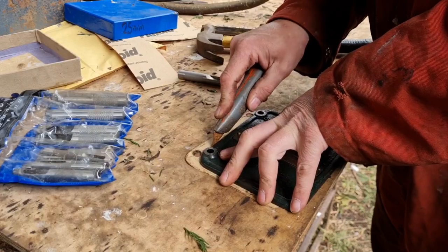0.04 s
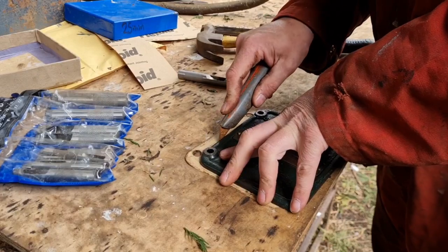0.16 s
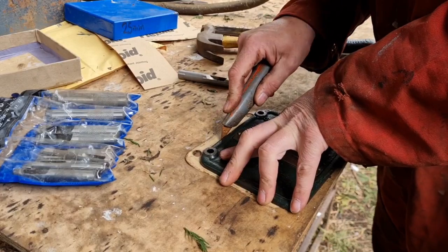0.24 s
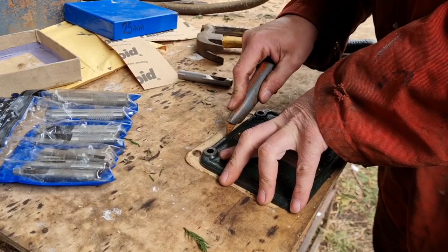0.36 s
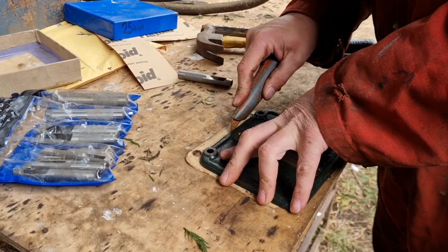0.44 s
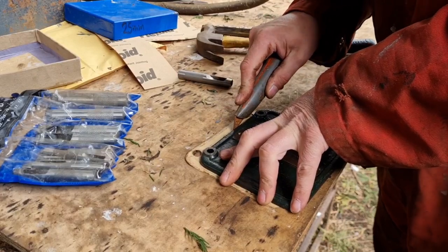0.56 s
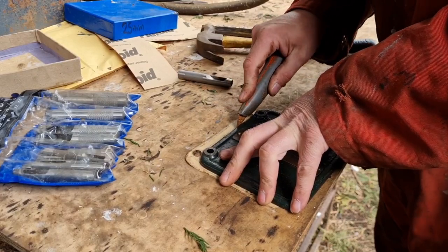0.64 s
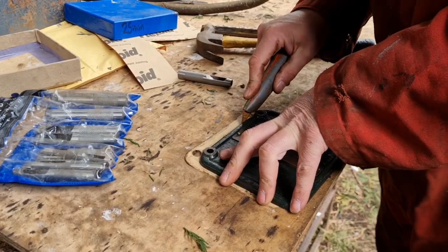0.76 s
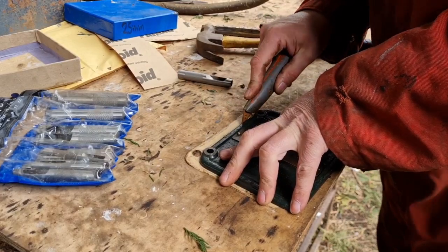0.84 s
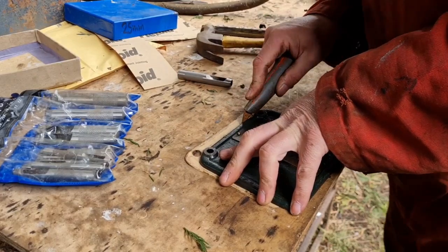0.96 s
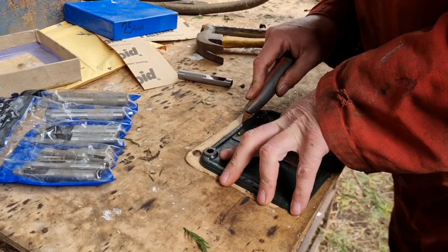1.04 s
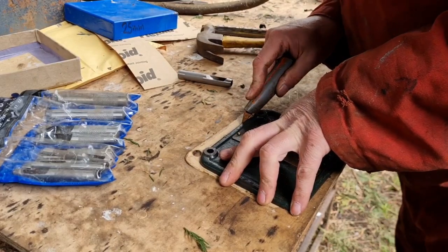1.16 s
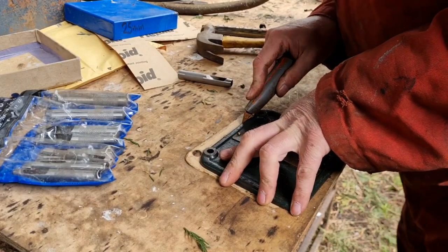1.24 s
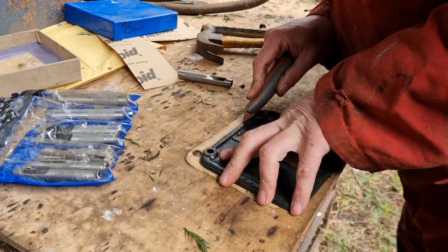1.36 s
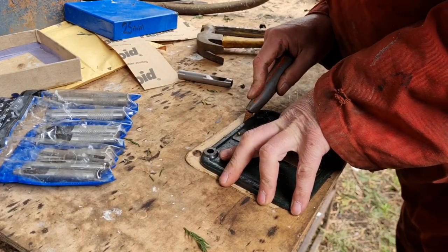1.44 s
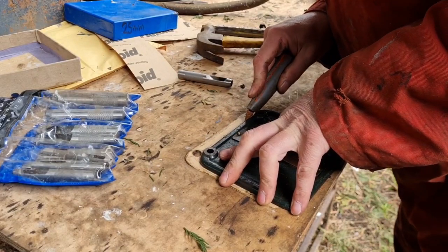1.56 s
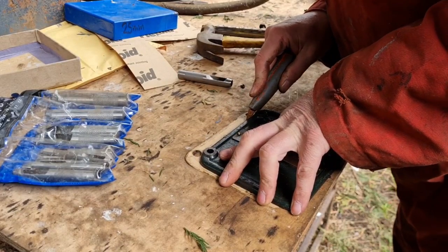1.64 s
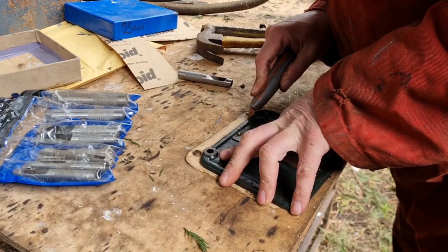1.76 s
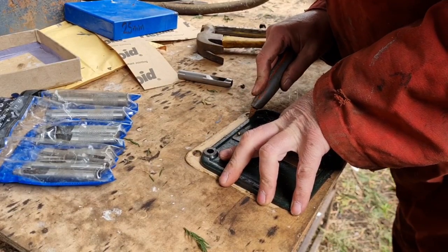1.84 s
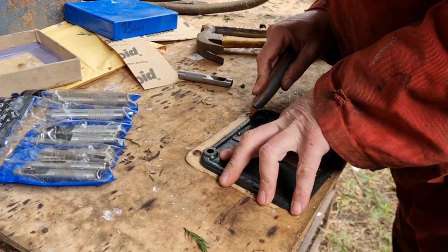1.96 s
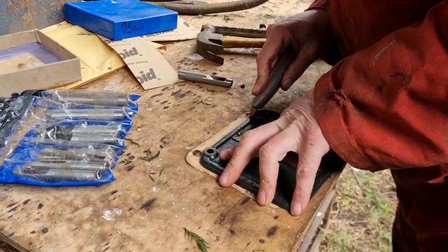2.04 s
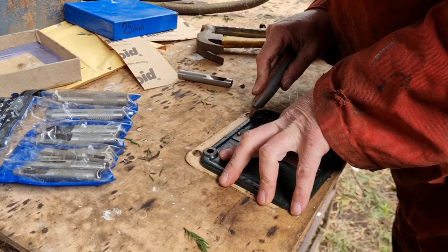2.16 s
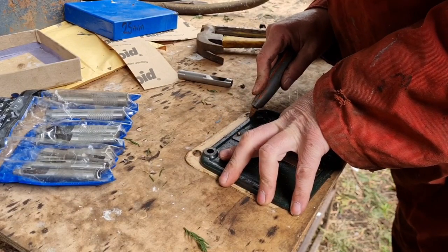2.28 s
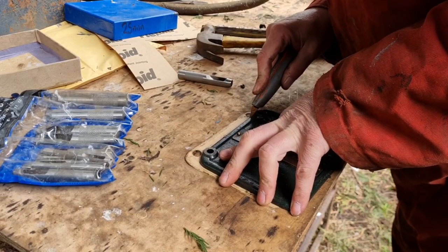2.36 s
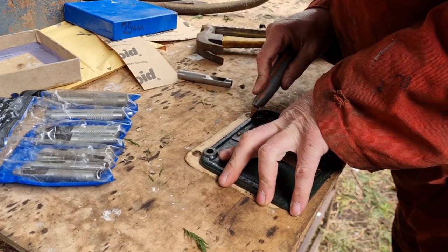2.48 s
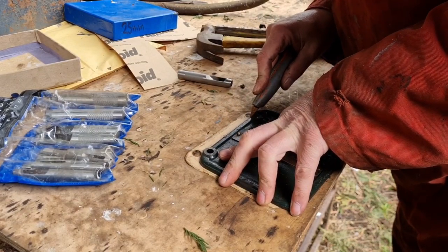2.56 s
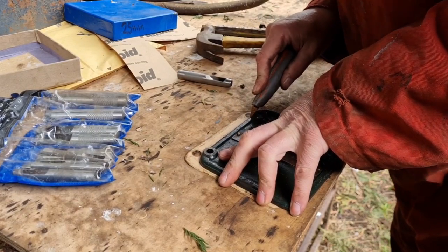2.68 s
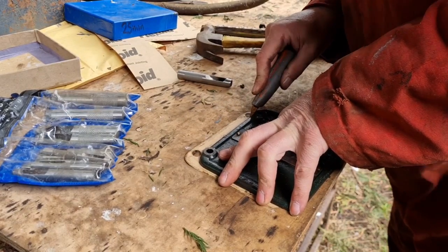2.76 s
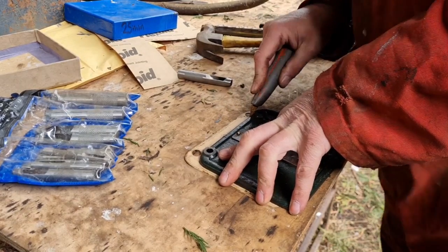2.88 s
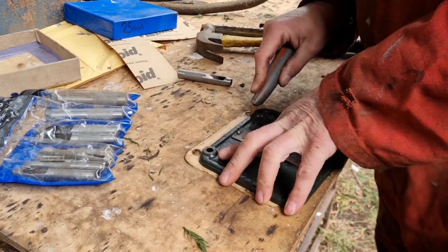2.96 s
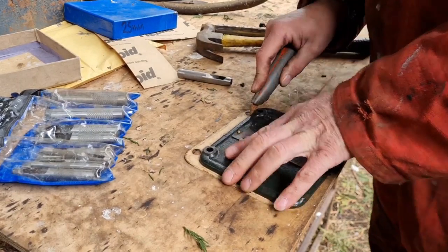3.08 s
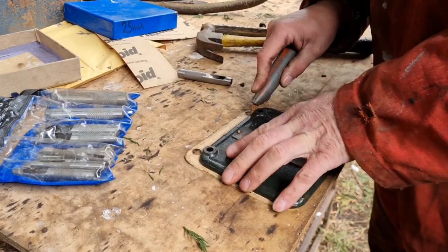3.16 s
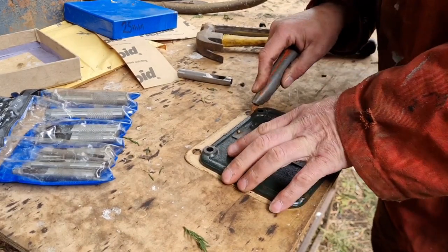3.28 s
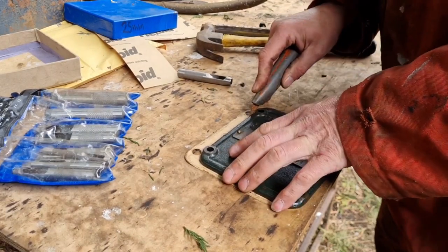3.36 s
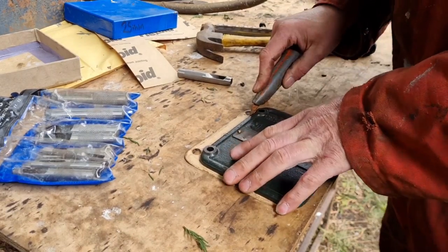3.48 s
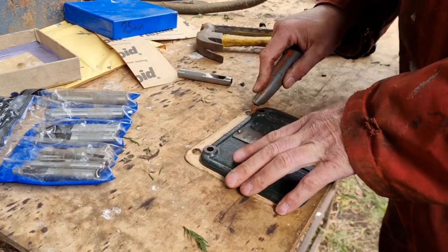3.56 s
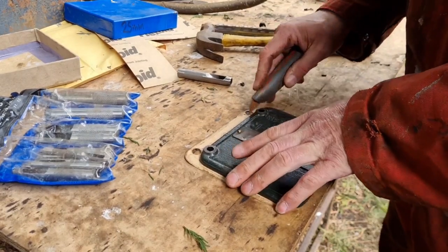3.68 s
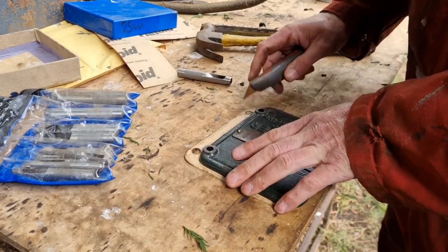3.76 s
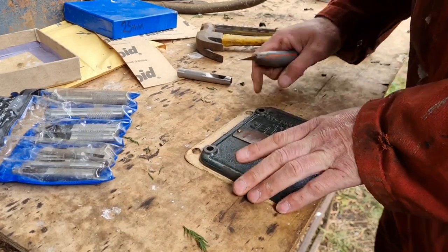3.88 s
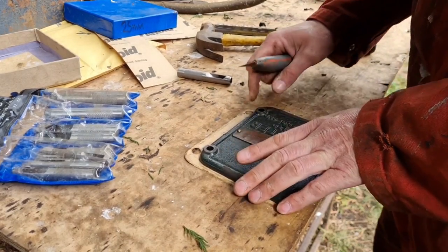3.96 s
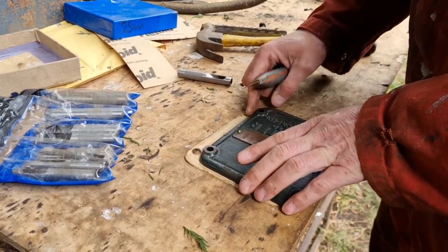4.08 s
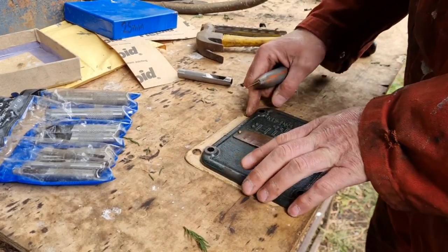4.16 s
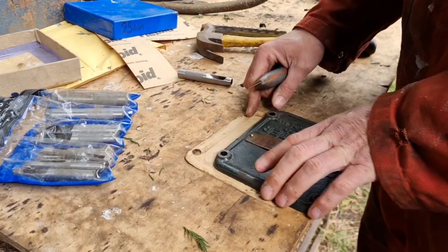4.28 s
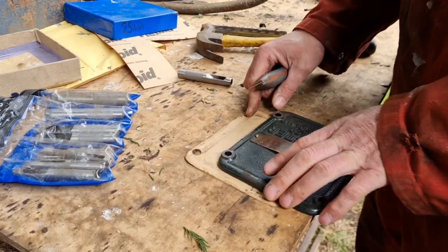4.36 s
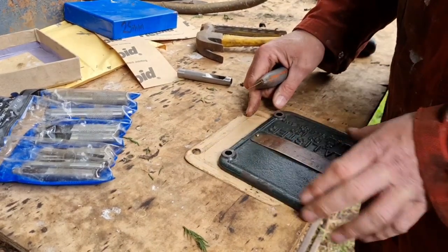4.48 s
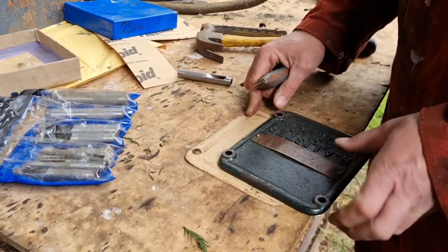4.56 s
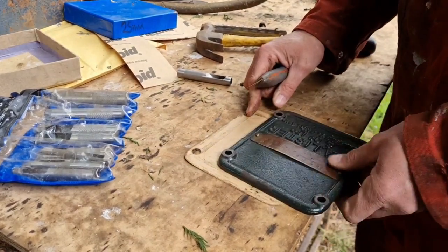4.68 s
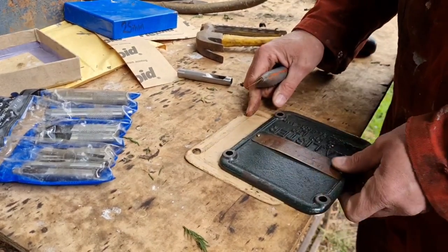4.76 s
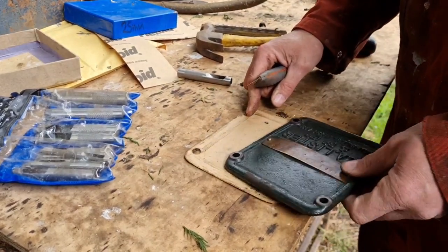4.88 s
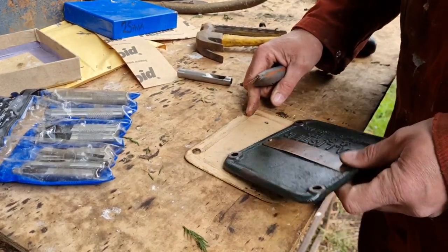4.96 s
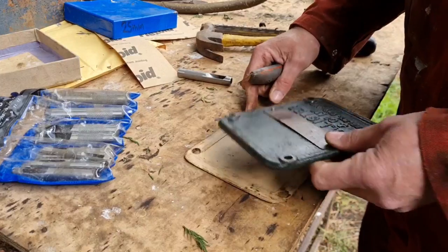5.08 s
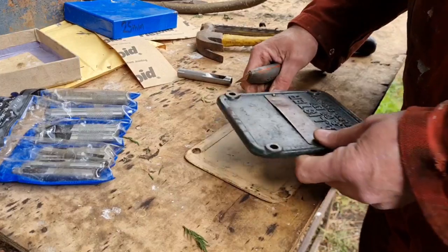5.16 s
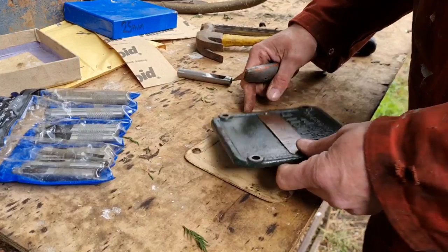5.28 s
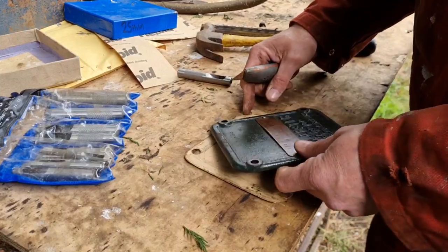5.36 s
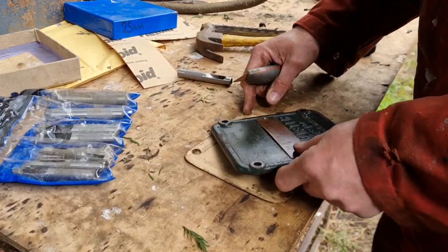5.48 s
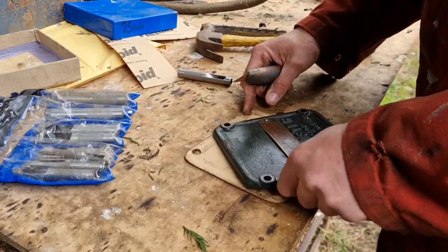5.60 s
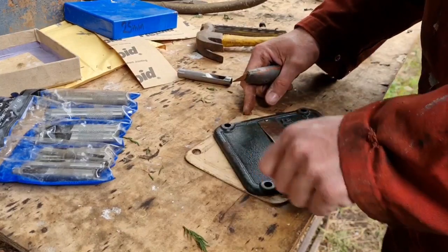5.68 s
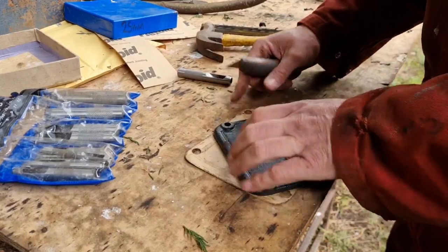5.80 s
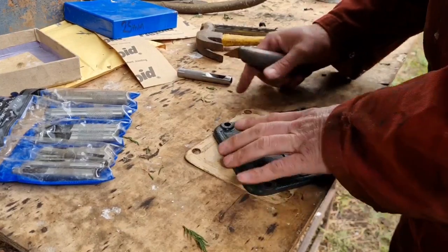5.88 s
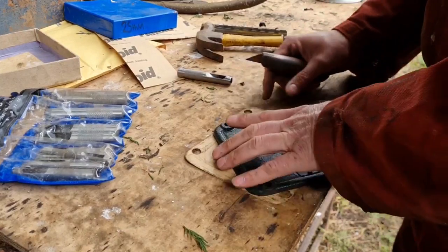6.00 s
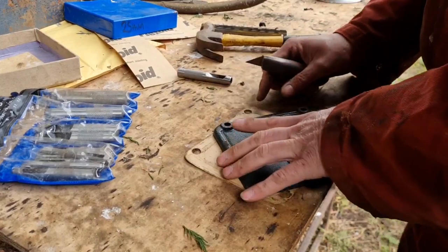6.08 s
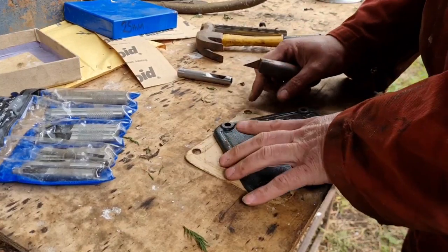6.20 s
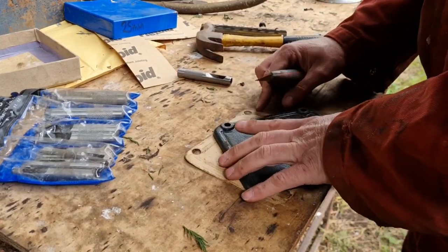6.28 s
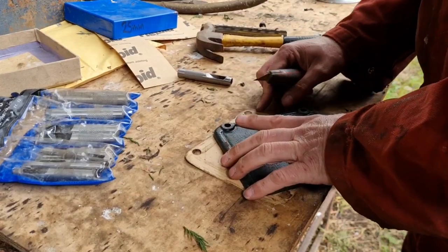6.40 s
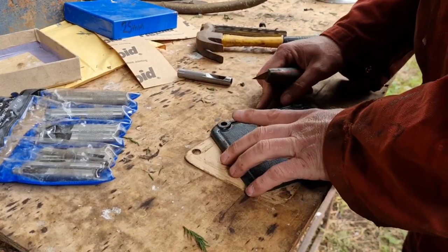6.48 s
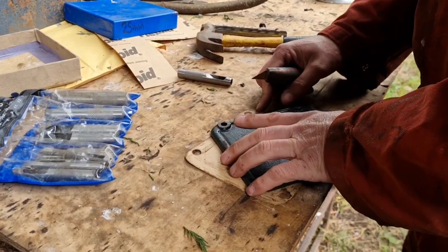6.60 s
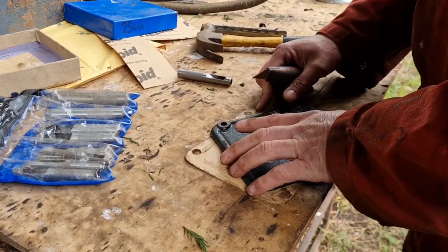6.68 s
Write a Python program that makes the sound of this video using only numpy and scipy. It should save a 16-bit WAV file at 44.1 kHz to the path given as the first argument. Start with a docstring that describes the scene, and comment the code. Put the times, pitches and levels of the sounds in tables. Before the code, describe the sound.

A small bird whistles the same short, high phrase over and over while gusts of wind bump the microphone outdoors. Up close, a blade rasps and clicks through paper against a wooden workbench, soon growing quieter. Then a metal plate drags softly over the bench, lands with two sharp, clattering knocks in quick succession, and shifts a little more.

```python
"""A knife scrapes through gasket paper around a cast cover plate, close by on a wooden bench outdoors.
Paper fibres snap, the bench rasps and the metal rings faintly. The plate is slid off, lifted and
set down with two rattling knocks that ring the bench top. Two small birds whistle in the trees,
one near, one distant. A breeze buffets the microphone, mostly its left port, over a soft murmur."""
import sys
import numpy as np
from scipy import signal
from scipy.fft import rfft, irfft, next_fast_len
from scipy.io import wavfile
from scipy.ndimage import uniform_filter1d, map_coordinates

SR = 44100
rng = np.random.default_rng(int(sys.argv[2]) if len(sys.argv) > 2 else 0)


def waveform_to_disk(signal):
    """Save audio, clipped to [-1, 1], as 16-bit WAV at the path in sys.argv[1]."""
    frames = np.transpose(np.atleast_2d(signal))
    scaled = np.clip(frames, -1, 1) * 32767
    samples = np.round(scaled).astype(np.int16)
    wavfile.write(sys.argv[1], SR, samples)


N = 297234


def amp(db):
    """Decibels to gain."""
    return 10 ** (np.asarray(db) / 20)


def unit(x):
    """Scale to rms 1."""
    return x / np.sqrt(np.mean(x ** 2) + 1e-20)


def along(points, hz):
    """Read (f/Hz, value) points on a log frequency axis."""
    f, values = np.transpose(points)
    return np.interp(np.log(hz + 1), np.log(f + 1), values)


def curves(rows):
    """One value per sample for each column after the time."""
    s, *columns = np.transpose(rows)
    return [np.interp(np.arange(N) / SR, s, column) for column in columns]


def wobble(rate):
    """A smooth random curve, rate knots a second."""
    coarse = np.linspace(0, N * rate / SR, SR // 10)
    curve = map_coordinates(rng.standard_normal(int(N * rate / SR) + 4), [coarse])
    return np.interp(np.arange(N) * rate / SR, coarse, curve)


def filtered(x, response):
    """Filter x by a gain given as a function of frequency."""
    size = x.shape[-1]
    padded = next_fast_len(size + 8192)
    return irfft(rfft(x, padded) * response(np.fft.rfftfreq(padded, 1 / SR)), padded)[..., :size]


def pan(db):
    """Left and right gains of mean power 1, the left louder by db."""
    return unit(amp([[db / 2], [-db / 2]]))


def add(track, s, sound):
    """Mix a sound in at time s."""
    part = track[..., max(0, round(s * SR)):][..., :sound.shape[-1]]
    part += sound[..., :part.shape[-1]]


def spread(pair, spectrum, likeness):
    """Two unrelated signals become coloured stereo of rms 1."""
    def mid_side(hz):
        angle = np.arccos(np.clip(along(likeness, hz), -1, 1)) / 2
        return amp(along(spectrum, hz)) * [np.cos(angle), np.sin(angle)]
    mid, side = filtered(pair, mid_side)
    return unit(np.array([mid + side, mid - side]))


def noise(size, spectrum, likeness):
    """Coloured stereo noise of rms 1."""
    return spread(rng.standard_normal((2, size)), spectrum, likeness)


def echo(x, decay):
    """A diffuse stereo tail in which each frequency dies at its own speed: (f/Hz, t60/s)."""
    hz, t, bands = signal.stft(rng.standard_normal((2, SR)), SR, nperseg=256)
    tail = signal.istft(bands * amp(-60 * t / along(decay, hz)[:, None]), SR, nperseg=256)[1]
    return signal.fftconvolve(np.atleast_2d(x), tail / np.linalg.norm(tail[0]), axes=1)[:, :x.shape[-1]]


def fibres(rate, smooth):
    """Paper fibres snap at random, rate times a second, over smooth sliding noise."""
    snaps = (rng.random(N) < rate / SR) * rng.standard_normal((2, N))
    return unit(snaps) + smooth * rng.standard_normal((2, N))


def stroke_levels(strokes, attack_s=0.15, release_s=0.22, arch_db=4):
    """Curves in dB: each stroke fades in over 60 dB, arches with the pressure and dies away."""
    t, power = np.arange(N) / SR, 0
    for s, length, *levels_db in strokes:
        progress = np.clip((t - s) / length, 0, 1)
        fade = np.maximum(s - t, 0) / attack_s + np.maximum(t - s - length, 0) / release_s
        envelope = amp(-arch_db * (2 * progress - 1) ** 2 - 60 * fade)
        power = power + np.outer(amp(levels_db), envelope) ** 2
    return 10 * np.log10(power + 1e-20)


# Paper hiss, close up: f/Hz, level/dB
PAPER_HISS = [(1500, -35), (3000, -3.5), (5000, 3.5), (7000, 4), (8500, -7.5), (11000, 2.5), (13000, -4),
              (15800, 0)]
# Bench work across the two microphone ports: f/Hz, left-right likeness
BENCH_LIKENESS = [(300, 0.96), (640, 0.79), (1400, 0.16), (3100, 0.14), (6800, 0.54), (12000, 0.79)]
def rubbing(strokes, spectrum, modes, snaps_per_s, catch_db):
    """Pressure draws a rasp from the bench, a faint ring from the metal and a hiss from the paper."""
    def metal(hz):
        return sum(amp(db) / (1 + 1j * (hz - centre) / width) ** 2 for centre, width, db in modes)
    rasp_db, hiss_db, ring_db = stroke_levels(strokes)
    catch = amp(catch_db * wobble(70))  # the edge catches and frees itself
    rasp = spread(fibres(snaps_per_s, smooth=0.64), spectrum, BENCH_LIKENESS) * amp(rasp_db + 1)
    rasp = filtered(rasp, lambda hz: 1 + 0.059 * np.exp(-2j * np.pi * hz * 0.001646))  # a near bounce
    hiss = spread(fibres(snaps_per_s, smooth=1), PAPER_HISS, BENCH_LIKENESS) * amp(hiss_db + 1.5)
    ring = unit(filtered(fibres(snaps_per_s, smooth=0.77), metal)) * amp(ring_db)
    return catch * (rasp * pan(-2) + hiss * pan(4.2) + ring)


# Knife strokes at the bench, close by: t/s, length/s, rasp/dB, hiss/dB, ring/dB
KNIFE_STROKES = [(0, 0.33, -54.5, -61.5, -63), (.22, 0.05, -47.5, -59.5, -55), (.375, 0.15, -45, -58, -56),
                 (.67, 0.082, -43.5, -59.5, -55.5), (.8, 0.47, -69, -76.5, -89),
                 (1.41, 0.08, -63.5, -80, -85), (1.61, .09, -57, -74, -86), (1.81, 0.064, -59, -72.5, -86),
                 (2.41, 0.052, -60, -81, -85), (2.84, 0.32, -61, -69.5, -71), (3.2, .15, -71, -80, -92)]
# Rasp of the bench under the knife: f/Hz, level/dB
KNIFE_RASP = [(100, -14), (250, 3.5), (450, 2.5), (750, 2.5), (1150, -9.5), (1700, -11), (2400, -16.5),
              (3200, -20), (5000, -35.5), (9000, -61), (15000, -59.5)]
# Resonances of the blade: f/Hz, width/Hz, level/dB
BLADE_MODES = [(2360, 145, -1), (3040, 130, 1), (3280, 70, 1), (4270, 90, -5), (4690, 120, -3)]
def knife():
    """The blade scrapes through the gasket paper, snapping its fibres."""
    return rubbing(KNIFE_STROKES, KNIFE_RASP, BLADE_MODES, snaps_per_s=1500, catch_db=1.14)


# Breeze right on the microphone: t/s, left/dB, right/dB
BREEZE = [(0, -33, -37), (.5, -30.5, -45), (.65, -38.5, -46), (.88, -29.5, -40), (1.15, -37.5, -45),
          (1.7, -34.5, -41), (1.86, -52, -45.5), (2.17, -49.5, -59), (2.38, -28.5, -56), (2.48, -29.5, -37),
          (2.74, -29, -45), (2.92, -43, -51.5), (3.3, -38.5, -46), (3.55, -59, -63), (4.27, -54, -64),
          (4.52, -40, -54), (4.95, -28.5, -51), (5.27, -31.5, -46), (5.36, -48, -55), (5.68, -40, -49),
          (5.93, -60, -65), (6.25, -41, -62), (6.74, -49.5, -60)]
# Puffs on the left port: crest t/s, rise/s, level/dB
LEFT_PUFFS = [(1.327, 0.062, -32), (1.507, 0.12, -26.5), (1.926, 0.053, -31.5), (2.079, 0.058, -33.5),
              (2.244, 0.074, -29), (2.507, 0.084, -22.5), (3.14, 0.11, -36.5), (4.404, 0.064, -30.5),
              (6.048, 0.096, -40.5), (6.348, 0.074, -34.5), (6.54, 0.11, -42.5)]
# Rumble in the ports: f/Hz, level/dB
PORT_RUMBLE = [(15, -28), (28, -24), (42, 4), (65, 4.5), (100, -2), (150, -9), (220, -20), (400, -33),
               (900, -55), (2000, -110)]
# Eddies thumping the left port: t/s, level/dB, f/Hz
LEFT_EDDIES = [(0.886, -22.5, 121), (1.455, -23.5, 80), (1.716, -25, 187), (2.221, -16, 75.7),
               (2.261, -20.5, 195), (2.464, -11, 133), (2.469, -14.5, 230), (2.497, -19, 110),
               (2.52, -18, 200), (2.609, -27, 165), (2.658, -24.5, 170), (2.714, -25.5, 187),
               (3.775, -31, 64.6), (4.391, -22.5, 74), (5.137, -15.5, 214), (5.271, -24.5, 152)]
def wind(eddy_attack_s=0.0021):
    """Turbulence rumbles in each port separately; puffs and single eddies push the left one."""
    ports = amp(curves(BREEZE))
    for crest, rise, db in LEFT_PUFFS:
        add(ports[0], crest - rise, amp(db) * np.hanning(int(2 * rise * SR)) ** 2)
    flutter = amp(2.54 * np.array([wobble(22.027), wobble(22)]))
    out = amp(-0.18) * ports * unit(flutter * noise(N, PORT_RUMBLE, likeness=[(60, 0.13)]))
    t = np.arange(SR // 10) / SR
    onset = 1 - np.exp(-(t / eddy_attack_s) ** 2)
    for s, db, hz in LEFT_EDDIES:
        age = 2 * t * hz  # the push crests about half a cycle in
        push = age * np.exp(1 - age) * np.sin(2 * np.pi * hz * t) * onset
        add(out, s, amp(db - 4) * pan(32) * push)
    return out


# Open country, all around: f/Hz, level/dB
COUNTRY_MURMUR = [(30, -3.5), (100, -1.5), (190, -6), (270, 2.5), (400, -5.5), (700, -12), (1000, -14.5),
                  (1600, -22.5), (2600, -34), (4200, -40), (8500, -44.5), (11000, -39.5), (15800, -44)]
# The murmur across the two ports: f/Hz, left-right likeness
MURMUR_LIKENESS = [(60, 1), (280, 0.97), (640, 0.07), (1400, -0.34), (3100, -0.002), (12000, 0.97)]
def air():
    """The soft murmur of open country drifts slightly in level."""
    drift = amp(0.8 * wobble(3))
    return drift * amp(-55) * pan(-2.5) * noise(N, COUNTRY_MURMUR, MURMUR_LIKENESS)


def whistle(pitch, envelope, waver):
    """A note of rms 1 that follows a pitch track with a quick, slight waver."""
    drift = 1 + waver * unit(uniform_filter1d(rng.standard_normal(len(pitch)), size=100))
    tone = np.sin(2 * np.pi * np.cumsum(pitch * drift) / SR)
    return unit(envelope * signal.windows.tukey(len(pitch), 0.15) * tone)


# A bird in the distance, a little left: t/s, length/s, first f/Hz, last f/Hz, level/dB
FAR_BIRD_NOTES = [(0.0, 0.013, 3660, 2980, -40), (0.005, 0.074, 7580, 6070, -57),
                  (0.037, .028, 4240, 3100, -45), (0.091, 0.03, 3869, 3070, -48),
                  (0.171, 0.034, 4650, 3410, -49.5), (0.175, .08, 7070, 5230, -59.5),
                  (0.237, 0.052, 3415, 3415, -43), (0.292, 0.077, 3420, 3490, -50.5)]
def far_bird():
    """A handful of short whistles, mostly falling."""
    song = np.zeros((2, N))
    for s, length, first_hz, last_hz, db in FAR_BIRD_NOTES:
        pitch = np.geomspace(first_hz, last_hz, int(length * SR))
        add(song, s, amp(db) * pan(2.2) * whistle(pitch, envelope=1, waver=0.0031))
    return song


# Echo of the trees around the bench: f/Hz, t60/s
TREE_DECAY = [(200, 0.36), (3400, 0.73), (4900, 0.69), (6500, 0.62), (10000, 0.63)]
def birds_in_trees():
    """Both songs arrive directly, scattered by branches and in the longer echo of the trees."""
    near, near_direct = near_bird()
    far = far_bird()
    scatter = echo(near + far, [(5000, 0.22)])
    tail = echo(near + far, TREE_DECAY)
    return near_direct + amp(-6) * far + amp(-1.5) * scatter + amp(-6.5) * tail


# Paper snaps and blade ticks, close by: t/s, snap/dB, tap on the bench/dB
BLADE_TICKS = [(0.115, -46, -68), (0.235, -51, -43.5), (0.279, -48.5, -57), (0.424, -42.5, -64),
               (0.502, -53, -41.5), (0.53, -61, -44.5), (0.812, -55, -63.5), (3.082, -47.5, -59),
               (3.746, -57.5, -48), (4.576, -65, -60), (4.775, -62, -43.5), (4.782, -55.5, -38.5),
               (5.603, -47.5, -47.5), (5.646, -55, -71)]
def ticks():
    """Each tick is a bright snap and a short tap through the wood."""
    out, t = np.zeros((2, N)), np.arange(SR // 10) / SR
    wood = [(150, -19), (300, 11), (750, -10.5), (1050, 4),  # f/Hz, level/dB
            (1700, -8.5), (3000, -17), (6000, -19), (10000, -36)]
    snap_decay = amp(-0.5 - 60 * t / 0.0086) + amp(-6.5 - 60 * t / 0.073)
    onset = 1 - np.exp(-t / 0.0006)  # paper cushions the contact
    for s, snap_db, tap_db in BLADE_TICKS:
        snap = noise(len(t), PAPER_HISS, BENCH_LIKENESS) * amp(snap_db) * snap_decay
        tap = noise(len(t), wood, BENCH_LIKENESS) * amp(tap_db + 1 - 60 * t / 0.071)
        add(out, s, (snap * pan(5) + tap * pan(-1.5)) * onset)
    return out


def slurs(notes, shape, final_hz, warm_up_db=6.5, warm_up_s=0.19, sag_hz_per_s=33):
    """Notes flick up, then sink; the song starts softly and sags in pitch. Returns (whole, direct)."""
    song, direct = np.zeros((2, 2, N))
    share, ratio, level_db = np.transpose(shape)
    beam_db_per_octave = 19.5  # the higher a note rises, the more it is beamed past the microphone
    for s, length, db, side_db in notes:
        progress = np.linspace(0, 1, int(length * SR))
        sung_s = s - NEAR_PHRASES[0][0]
        rise = np.interp(progress, share, ratio)
        pitch = (final_hz - sag_hz_per_s * sung_s) * rise
        envelope = amp(np.interp(progress, share, level_db))
        effort = amp(db - warm_up_db * np.exp(-sung_s / warm_up_s))
        note = effort * pan(side_db) * whistle(pitch, envelope, waver=0.0099)
        add(song, s, note)
        add(direct, s, note * amp(-beam_db_per_octave * np.log2(np.maximum(rise, 1))))
    return song, direct


# A bird in a nearby tree, to the left:
# t/s, second high note after/s, low notes after/s, high level/dB, low level/dB, left minus right/dB
NEAR_PHRASES = [(1.048, 0.25, 0.49, -58, -57.5, 1), (2.022, .25, .491, -55, -55.5, 1),
                (3.0, 0.26, .51, -55, -55.5, 2.5), (4.035, 0.3, 0.55, -56.5, -56, 4),
                (5.125, .26, .54, -60, -59.3, 5), (6.18, 0.27, 0.6, -57.7, -57.5, 4.5)]
# Its high and low notes: share of the length, pitch over final pitch, level/dB
HIGH_SLUR = [(0, .96, -20), (.08, 1.22, -6), (.16, 1.22, -1), (.34, 1.13, 1), (.55, 1.055, 1),
             (.78, 1.012, 1.5), (1, .995, 2)]
LOW_SLUR = [(0, 1.12, -14), (.1, 1.27, -8), (.15, 1.25, -13), (.19, 1.07, -13), (.32, 1.04, -8),
            (.54, 1.005, -1), (.8, 1, 1), (1, .995, -2)]
# Accents of its three low notes: level/dB
LOW_ACCENTS = [0.7, 0.5, 0]
# It turns away from the microphone as it sings: t/s, direct level/dB
BIRD_FACING = [(1.0, 1), (1.6, -6.5), (2.2, -1), (2.9, -4), (3.5, -9.5), (6.7, -5)]
def near_bird(first_s=0.146, second_s=0.168, low_s=0.1, beat_s=0.157):
    """Phrases of two high falling whistles and three low ones at an even beat. Returns (whole, direct)."""
    high, low = [], []
    for s, second_after, low_after, high_db, low_db, side_db in NEAR_PHRASES:
        high.append((s, first_s, high_db, side_db))
        high.append((s + second_after, second_s, high_db + 0.3, side_db))
        for k, accent_db in enumerate(LOW_ACCENTS):
            low.append((s + low_after + k * beat_s, low_s, low_db + accent_db, side_db + 5))
    song, direct = np.add(slurs(high, HIGH_SLUR, final_hz=6227), slurs(low, LOW_SLUR, final_hz=5017))
    direct_db, = curves(BIRD_FACING)
    return song, amp(direct_db + 0.4) * direct


# Hand and plate sliding, close by: t/s, length/s, rasp/dB, hiss/dB, ring/dB
PLATE_STROKES = [(3.748, 0.026, -59, -75, -81), (3.86, 0.12, -85, -70.5, -90),
                 (4.275, 0.13, -49.5, -60, -64), (4.52, 0.078, -58, -63, -66),
                 (4.84, 0.18, -52, -62.5, -60), (5.57, 0.096, -55.5, -66.5, -59.5),
                 (5.78, 0.097, -61, -74, -77), (5.98, 0.13, -57.5, -71, -65),
                 (6.17, 0.12, -61.5, -68.5, -71.5), (6.52, 0.22, -61, -85, -77)]
# Rasp under the plate: f/Hz, level/dB
PLATE_RASP = [(100, -23), (280, 3.5), (600, -6.5), (1100, -8.5), (1600, -13), (2050, -12), (2450, -18),
              (2900, -19), (4500, -21), (9000, -32), (15000, -60)]
# Resonances of the plate: f/Hz, width/Hz, level/dB
PLATE_MODES = [(2007, 49, 3.5), (2830, 52, -0.5), (3320, 45, 1.5), (3920, 90, -2), (4270, 70, -3.5)]
def plate_slides():
    """The cast plate drags over gasket and bench, ringing faintly."""
    return rubbing(PLATE_STROKES, PLATE_RASP, PLATE_MODES, snaps_per_s=3100, catch_db=1.16)


def rocking(count, start_s=5.421, beat_s=0.037, db=-21, loss_db=3, hz=450, dulling=0.81):
    """After its first landing the plate rocks at an even beat, each contact weaker and duller."""
    return [(start_s + k * beat_s, db - k * loss_db, hz * dulling ** k) for k in range(count)]


# Plate corners landing on the bench, close by: t/s, level/dB, contact cutoff f/Hz
LANDINGS = [(5.3816, -2.5, 337), (5.391, -6, 675), (5.3932, -15.5, 1340), (5.399, -17.5, 848),
            (5.707, -16.5, 614), (5.714, -17.5, 450), (5.722, -23, 1510), (5.73, -23, 847),
            (5.756, -18, 560), (5.772, -22.5, 650)]
# Bench top under the plate: f/Hz, level/dB, t60/s
BENCH_MODES = [(83.8, -23, 0.42), (123, -3.5, 0.055), (153.6, -2.5, 0.065), (228, -5.5, 0.05),
               (287, 0, 0.074), (322, -1.5, 0.035), (418, -17.5, 0.15), (502, -15, 0.056), (546, -13, 0.12),
               (659, -6, 0.1), (832, -10, 0.052), (922, -11.5, 0.058), (990, -11.5, 0.055),
               (1151, -11, 0.11), (1260, -21, 0.042), (1570, -13, 0.052), (2050, -8.5, 0.055)]
# Echo of the yard: f/Hz, t60/s
YARD_DECAY = [(100, 0.65), (400, 0.14), (1500, 0.14), (3500, 0.34), (8000, 0.18)]
def plate_knocks():
    """The plate's corners land one after another; harder contacts reach higher modes of the bench."""
    out, t = np.zeros((2, N)), np.arange(SR // 4) / SR
    hz, db, t60 = np.transpose(BENCH_MODES)
    polarity = (-1) ** (np.arange(len(hz)) // 2)  # some modes push the air first, others pull
    lag_s = np.array([[0], [0.00013]])  # the left port hears the bench first
    age = np.maximum(t - lag_s, 0)[..., None]
    modes = np.sin(2 * np.pi * hz * age) * amp(-60 * age / t60)
    grit = [(150, -22.5), (400, 2.5), (1150, -3), (2500, -6.5),  # f/Hz, level/dB
            (5000, -4.5), (8000, -10), (15000, -2.5)]
    onset = 1 - np.exp(-t / 0.0006)
    for s, level_db, contact_hz in LANDINGS + rocking(count=5):
        lowpass = lambda f: 1 / np.sqrt(1 + (f / contact_hz) ** 4)
        strength = amp(db + 2.4 * rng.standard_normal(len(hz))) * lowpass(hz) * polarity
        ring = np.sum(modes * strength, axis=-1)
        crack = filtered(noise(len(t), grit, BENCH_LIKENESS), lowpass) * amp(-60 * t / 0.075)
        add(out, s, amp(level_db) * (amp(-5.5) * ring + amp(2) * crack) * onset)
    tail = echo(out.mean(0), YARD_DECAY)
    return out * pan(-1.1) + amp(-15) * tail[0] + amp(-20) * tail


def scene():
    """Bench work, birds and weather, heard from one spot beside the bench."""
    return knife() + plate_slides() + ticks() + plate_knocks() + birds_in_trees() + wind() + air()


def record(dry, top_hz=15850):
    """The camera keeps nothing above its band limit."""
    return filtered(dry, lambda hz: hz < top_hz)


dry = scene()
out = record(dry)
waveform_to_disk(out)
```